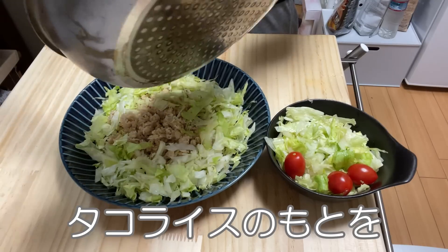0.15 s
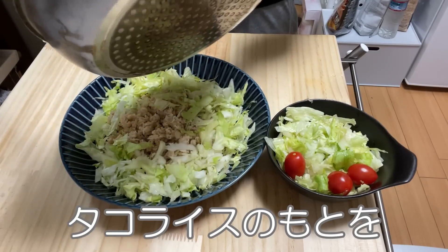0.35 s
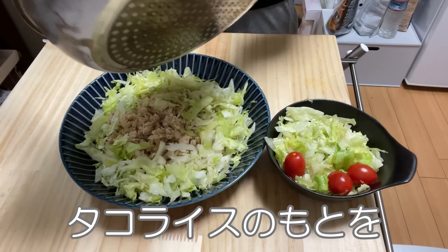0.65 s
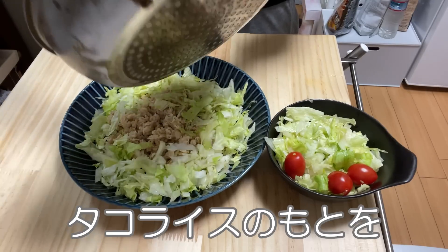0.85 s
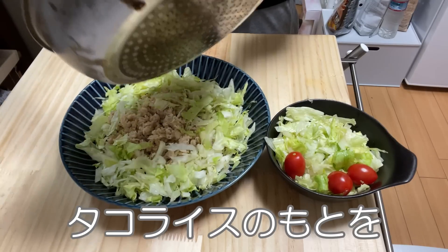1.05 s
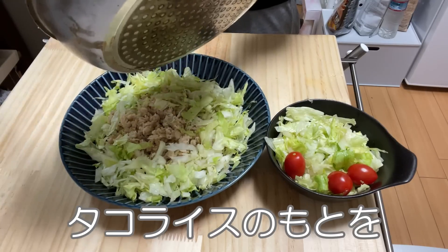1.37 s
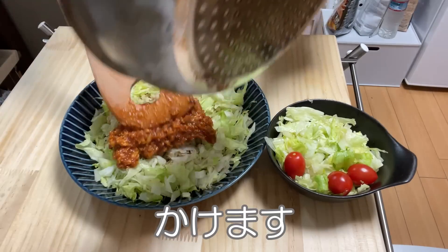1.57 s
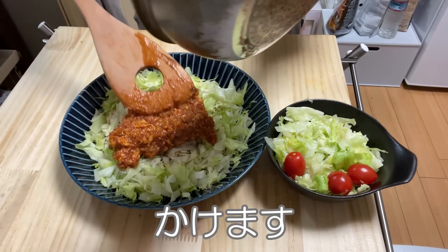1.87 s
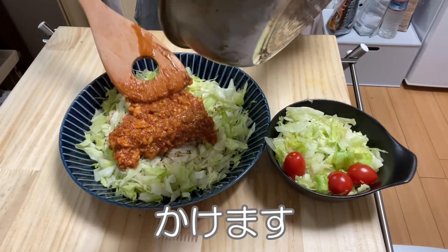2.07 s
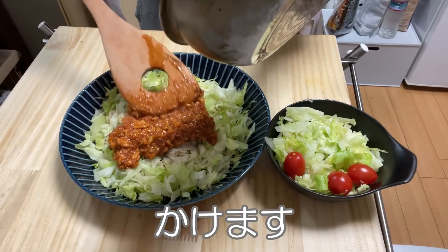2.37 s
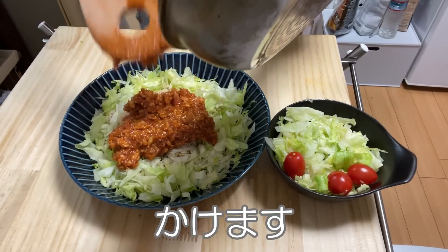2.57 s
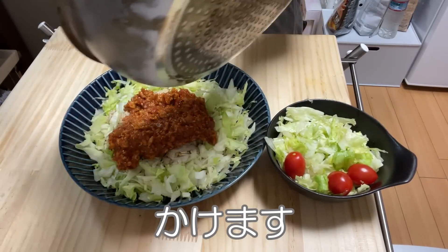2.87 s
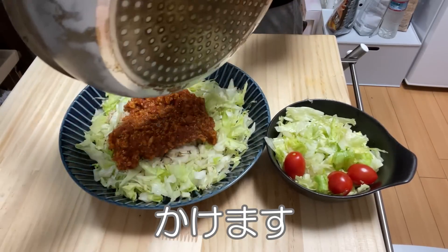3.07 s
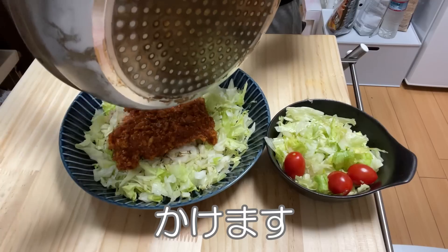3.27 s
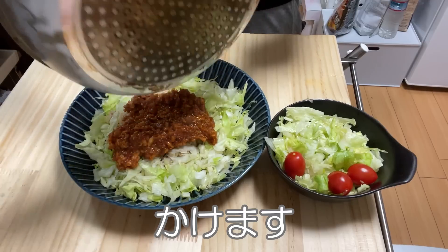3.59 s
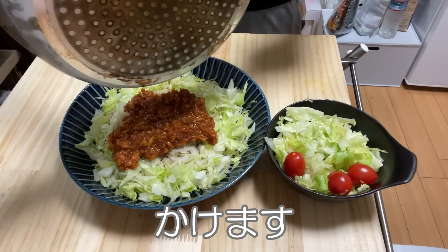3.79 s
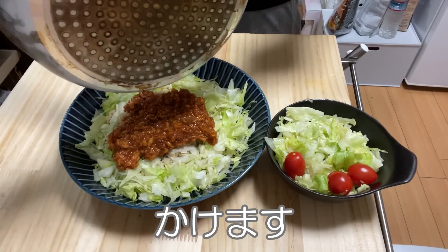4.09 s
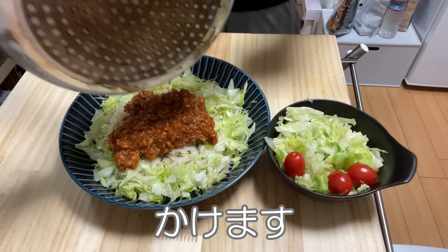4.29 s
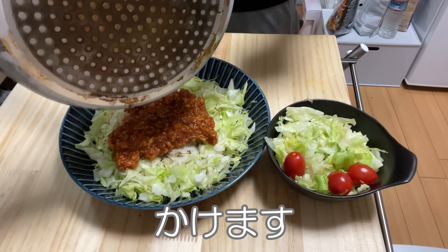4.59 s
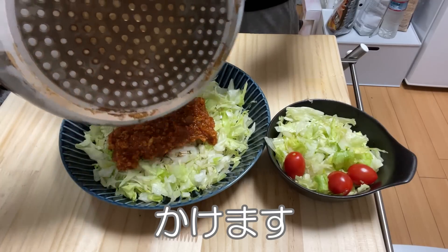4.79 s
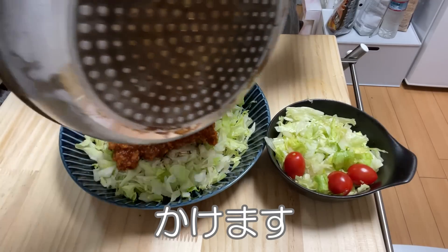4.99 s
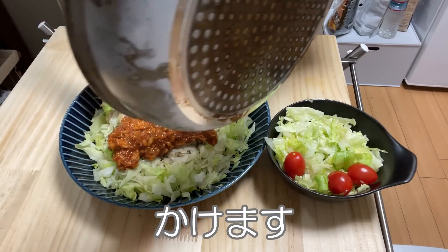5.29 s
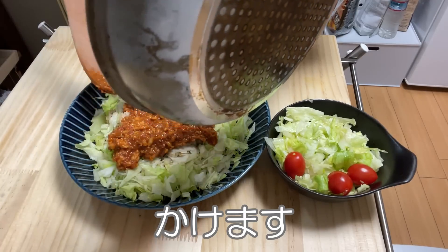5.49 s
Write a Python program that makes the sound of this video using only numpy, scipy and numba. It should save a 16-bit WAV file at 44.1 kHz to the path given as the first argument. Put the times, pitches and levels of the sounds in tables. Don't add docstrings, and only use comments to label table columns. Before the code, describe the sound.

Four fast strokes open the scene, each a hollow wooden knock, small rim bump and rough wet scrape accelerating to a lift. Light rubbing fades into soft drips and fridge hum. A hard double blow follows, then three spaced knock, scrape and bump groups with longer metallic ring. Close stereo phone pickup, overloaded on peaks, short small-room reflections, then faint wet sliding.

```python
import sys
import numpy as np
from scipy import signal
from scipy.fft import rfft, irfft, next_fast_len
from scipy.io import wavfile
from scipy.ndimage import uniform_filter1d
from numba import njit

SR = 44100
rng = np.random.default_rng(int(sys.argv[2]) if len(sys.argv) > 2 else 0)


def elevation(decibels):
    levels = np.asarray(decibels, float)
    return 10 ** (levels / 20)


def wrap_up_sound(samples):
    columns = np.atleast_2d(samples).T
    tamed = np.clip(columns, -1, 1)
    steps = np.round(tamed * 32767).astype(np.int16)
    wavfile.write(sys.argv[1], SR, steps)


N = 248929
UPTURN_S = 2.96


def read(table, hz):
    f, v = np.transpose(table)
    return np.interp(np.log(np.maximum(hz, 1)), np.log(f), v)


def ring(x, hz, t60, skew=0.):
    pole = np.exp((2j * np.pi * hz - np.log(1000) / t60) / SR)
    z = signal.lfilter([1], [1, -pole], x)
    side = np.array([[1], [-1]])
    return (z * np.exp(1j * skew * min(hz / 1000, 1) * side)).imag


def band(x, lo_hz, hi_hz):
    return signal.sosfilt(signal.butter(2, [lo_hz, hi_hz], "band", fs=SR, output="sos"), x)


def unit(x):
    return x / np.sqrt(np.mean(x ** 2))


def walk(rate):
    k = int(SR / rate)
    held = np.repeat(rng.standard_normal(N // k + 1), k)
    return unit(uniform_filter1d(held, k)[:N])


@njit
def sweep(x, hz, width):
    y, b, l = np.empty(len(x)), 0., 0.
    for i in range(len(x)):
        g, k = np.tan(np.pi * hz[i] / SR), width / hz[i]
        v = (b + g * (x[i] - l)) / (1 + g * (g + k))
        b, l, y[i] = 2 * v - b, l + 2 * g * v, k * v
    return y


def soft(y):
    push = np.hanning(15)
    return signal.lfilter(push / push.sum(), [1], y)


# pitch_hz, t60_s, tilted_level_db, upturned_level_db
POT_MODES = [(402.22, 0.22, -28.5, -13.5), (559.36, .045, -12, -11.5), (697.18, 0.2, -30.5, -7),
             (829.8, 0.26, -12, 1), (915, 0.28, -5, -21), (1120, 0.088, -9.5, -12.5),
             (1300.1, 0.047, -11, -7.5), (1669.8, 0.15, 1, 3), (1773.3, 0.13, 0, -14),
             (2012.2, 0.24, -8, -18.5), (2509.2, 0.22, 1, -14.5), (2697.3, 0.16, 2.5, 6.5),
             (3350, .1, -2, -1), (3980, 0.35, -2.5, 1), (4480, 0.21, -1, -6), (5390, 0.36, -12, -3),
             (5799, 0.069, -2.5, -8.5), (6807.9, 0.07, -2.5, -2), (7755, 0.09, -10, -10),
             (8303.6, 0.089, -16.5, -16.5), (8750, .07, -22, -22), (9353.6, 0.15, -12, -2),
             (10549, 0.091, -33, -19.5), (11115, 0.12, -20.5, -17.5), (12243, 0.054, -16.5, -16.5),
             (15530, .06, -20.5, -21)]
# wall_ring_db, crack_db
KNOCKS = [
    (0.035, -7.5, 864.1, -21, -33),
    (0.423, 1.5, 913.3, -14.5, -21),
    (0.753, -7, 932.2, -11, -34),
    (1.053, 2, 924.5, -16, -27),
    (2.895, -31.5, 964, -5.5, -6),
    (2.905, 2.5, 959.7, -13, -20.5),
    (3.492, -4, 1016, -7.5, -16.5),
    (3.934, -11.5, 901.6, -12, -20),
    (4.273, -4.5, 913.5, -3, -11),
]
# wall_ring_db, crack_db
BUMPS = [
    (0.167, -12, 1120, -19, -17.5),
    (0.52, -19, 915, -15, -12.5),
    (0.813, -19, 1110, -10.5, -26),
    (1.149, -12.5, 929.2, -18.5, -23.5),
    (2.977, -14, 943.5, 0.5, -1),
    (3.64, -7.5, 842.6, 0.5, -40.5),
    (3.978, -0.5, 802.1, -5.5, -16.5),
    (4.368, 0.5, 823.7, -1.5, -16),
]
# start_s, peak_db, pitch_hz, t60_s
BLADE = [(0.0345, -16.5, 1141, 0.0302), (0.4229, -5, 1093, 0.01751), (0.7508, -15, 1127, 0.05366),
         (1.0512, -10, 1154, 0.0333), (2.9033, 0, 1207, 0.018453), (2.9737, -12, 1144, 0.029),
         (3.492, -4, 1803, 0.02662), (3.6402, -11.5, 1572, 0.05411), (3.933, -22, 1706, 0.052),
         (3.9757, -1.5, 1327, 0.014883), (4.2721, -2.5, 1765, 0.02385), (4.366, 3, 1617, 0.009744)]
# start_s, peak_db, pitch_hz, t60_s
CLINKS = [
    (0.184, -20, 3243, 0.03955),
    (0.521, -9, 4461, 0.0481),
    (0.8699, -25.5, 4432, 0.058),
    (1.1742, -29, 3455, 0.06675),
    (2.9073, -24, 3317, 0.05),
    (2.9771, -14, 3980, 0.072),
    (4.2707, -13.5, 3314, 0.02963),
]


def blows():
    knock_thud_db, bump_thud_db = -17, -28
    span = SR // 3
    out = np.zeros((2, N + SR))
    t, tap = np.arange(span) / SR, np.arange(span) == 0
    hits = [(*row, knock_thud_db) for row in KNOCKS] + [(*row, bump_thud_db) for row in BUMPS]
    chance = rng.standard_normal((len(hits), len(POT_MODES), 3))
    for (s, db, hz, wall_db, crack_db, thud_db), luck in zip(sorted(hits), chance):
        force = [(300, thud_db), (600, thud_db), (800, 0), (1200, 0),
                 (1500, wall_db), (2200, wall_db), (2700, crack_db)]
        y = elevation(1) * ring(tap, hz, 0.03531)
        y += elevation(thud_db - 3) * ring(tap, 450, 0.014)
        y += elevation(thud_db - 8) * ring(tap, 59, 0.12)
        crack = band(rng.standard_normal((2, span)), 1300, 4500) * np.exp(-t / 0.0052)
        for (f, t60, tilted_db, upturned_db), (size, pitch, skew) in zip(POT_MODES, luck):
            pose_db = upturned_db if s > UPTURN_S else tilted_db
            short = t60 * (.65 if f > 2500 else 1)
            pair = ring(tap, f * (1 + .006 * pitch), short, 0.34 * skew)
            pair += 0.23 * ring(tap, f + 45 + 12 * pitch, short, -.4 * skew)
            bright_db = -4 if f > 2500 else 0
            y += elevation(pose_db + read(force, f) - 11.5 + bright_db + size) * pair
        out[:, int(s * SR):][:, :span] += elevation(db) * (soft(y) + elevation(crack_db + 8.5) * crack)
    for s, db, hz, t60 in BLADE + CLINKS:
        out[:, int(s * SR):][:, :span] += elevation(db + 1.9 * hz / 1000) * soft(ring(tap, hz, t60))
    return out[:, :N]


def column(values):
    return np.array(values)[:, None]


def layers(s, db, rasp_db, hiss_db):
    wall_db, follow = (1, .3) if s > UPTURN_S else (-3, .4)
    return elevation(db + column([0, wall_db + follow * rasp_db, rasp_db, hiss_db]))


# rasp_db, hiss_db
SCOOPS = [
    (0.189, 0.10789, -16.5, -19.5, -27.5),
    (0.525, 0.092, -15, -14.5, -22),
    (0.88, .105, -12.5, -20, -32),
    (1.175, .095, -15, -19.5, -28),
    (1.497, 0.07203, -62.5, -4, -9),
    (2.969, .045, -20, -13, -22),
    (3.623, .1, -22.5, -9.5, -17),
    (3.978, .035, -22.5, -10.5, -16.5),
    (4.364, .05, -26, -7, -14),
]
# rasp_db, hiss_db
SETTLES = [(.05, 0.1965, -34, -31, -35), (.44, 0.0967, -20.5, -18, -29), (.77, 0.1881, -28, -26, -35),
           (1.075, 0.1428, -25, -20, -38), (2.92, 0.1238, -21.5, -14, -38), (2.99, 0.0641, -30, -14, -20),
           (3.51, 0.0427, -30, -5, -26.5), (3.655, 0.051, -23, -22.5, -33), (3.94, 0.0989, -25, -11, -20),
           (3.995, 0.0834, -20.5, -18, -30), (4.29, 0.0806, -27, -8, -28), (4.39, 0.1284, -25, -19, -30.5)]
# rasp_db, hiss_db
RUBS = [(.395, 0.22, -63, 1, 4), (.65, 0.1657, -56, -2.5, 3), (1.24, .14, -51, -12, -26),
        (1.31, 0.1085, -58.5, -4.5, -18.5), (1.4, 0.0022, -56.5, -16, -20), (3.03, 0.0888, -39, -6, -12),
        (3.08, 0.1447, -45.5, -8, -8), (3.13, 0.1315, -48, -12, -14), (3.205, 0.1169, -35.5, -10.5, -11.5),
        (3.7, 0.0214, -33, -21, -21.5), (4.025, 0.0951, -34, -7, -8), (4.44, 0.1414, -42, -12, -26),
        (4.5, 0.0719, -40, -14.5, -14), (4.66, 0.1857, -61.5, -9.5, -5), (4.75, 0.0194, -46.5, -10, -15)]
SPEED_POWER = [1.5, .8, 1.3, 0.69]
LIFT_FALL = [1100, 800, 599.7, 500]
TAIL_LEVEL = [-26, -24, -17, -22.5]
TAIL_FALL = [149.9, 140, 160.1, 139.94]


def stroke_force():
    rub_attack_s, settle_wall_db = .015, -5.5
    settle_curve, rub_curve = 0.73, 1.9
    rest_hz, squeeze_hz = (870.4, 849.25), (139.7, 35)
    t, power, squeeze = np.arange(N) / SR, np.zeros((4, N)), np.zeros(N)
    for s, length, db, rasp_db, hiss_db in SCOOPS:
        on = slice(int((s - length) * SR), int((s + .5) * SR))
        late = np.maximum(t[on] - s, 0)
        speed = np.clip(1 + (t[on] - s) / length, 0, 1)
        after = elevation(-column(LIFT_FALL) * late)
        after = after + (late > 0) * elevation(column(TAIL_LEVEL) - column(TAIL_FALL) * late)
        power[:, on] += (layers(s, db, rasp_db, hiss_db) * speed ** column(SPEED_POWER) * after) ** 2
        squeeze[on] += np.sin(np.pi / 2 * np.minimum(2 * speed, 1)) * np.exp(-late / 0.023)
    contacts = [(*row, settle_curve, settle_wall_db) for row in SETTLES]
    contacts += [(*row, rub_curve, 0) for row in RUBS]
    for s, fall, db, rasp_db, hiss_db, curve, wall_db in contacts:
        on = slice(int(s * SR), int((s + .5) * SR))
        late = t[on] - t[on][0]
        swell = np.minimum(late / rub_attack_s, 1) * elevation(-20 * (late / fall) ** curve)
        power[:, on] += (layers(s, db, rasp_db, hiss_db) * elevation(column([0, wall_db, 0, 0])) * swell) ** 2
    up = 1 * (t > UPTURN_S)
    return np.sqrt(power), np.take(rest_hz, up) + np.take(squeeze_hz, up) * squeeze


def drags():
    push, hz = stroke_force()
    shake = 1.5 * walk(70)
    grit = []
    for p in push:
        chatter = elevation(shake + 3.3 * walk(60) + 1.1 * walk(400))
        grit.append(p * unit(chatter * rng.standard_normal(N)))
    out = elevation(18) * sweep(sweep(grit[0], hz, 170.0), hz, 170.0)
    out += elevation(-5) * band(grit[0], 600, 1400)
    out += elevation(-1) * band(band(grit[1], 1350, 2100), 1350, 2500)
    out += elevation(5) * band(band(grit[2], 2300, 6200), 2300, 6200)
    out += elevation(-9) * band(band(grit[3], 8100, 13500), 8100, 13500)
    for (f, t60, tilted_db, upturned_db), skew in zip(POT_MODES, rng.standard_normal(len(POT_MODES))):
        part = np.searchsorted([1400, 2350, 6200], f)
        held = [0.55, 0.17, .25, 0.4][part] * t60
        lift_db = [-4.5, -5.5, -9.5, 3.5][part]
        pose_db = np.where(np.arange(N) > UPTURN_S * SR, upturned_db, tilted_db)
        force = grit[part] * elevation(pose_db + lift_db)
        out = out + ring(force, f, held, 0.6752 * skew) * np.sqrt(4 * np.log(1000) / (held * SR))
    return band(band(out, 320, 15800), 300, 17000)


# start_s, length_s, level_db, pitch_hz
SLIDE = [
    (4.92, 0.5591, -68.5, 2312),
    (5.591, 0.2285, -65.5, 2431),
]


def slide():
    t, size, hz = np.arange(N) / SR, np.zeros(N), np.zeros(N)
    for s, length, db, f in SLIDE:
        arch = np.sin(np.pi * np.clip((t - s) / length, 0, 1)) ** 0.673
        size += elevation(db) * arch * (t < s + length)
        hz[(t > s) | (hz == 0)] = f
    noise = rng.standard_normal(N)
    high = unit(sweep(sweep(noise, hz, 160.), hz, 160.))
    low = unit(sweep(noise, 0.70094 * hz, 120.))
    return size * elevation(2.092 * walk(22)) * (high + elevation(1) * low)


# start_s, peak_db, pitch_hz
DROPS = [(0.3041, -43.5, 3695), (0.6485, -37.5, 3570), (0.8102, -38.5, 4480), (0.9601, -41, 3500),
         (1.7387, -52.5, 11000), (1.7785, -51, 7400), (1.8931, -50, 12600), (1.9106, -44, 10780),
         (1.9565, -39.5, 7766), (2.4286, -56.5, 11260), (2.4601, -36, 10790), (2.4788, -41, 10800),
         (3.341, -41.5, 7167), (3.8013, -47.5, 11400), (4.7716, -56, 3504), (5.1934, -52.5, 6960),
         (5.2661, -51.5, 4234), (5.47, -53, 11130)]


def drops():
    out, t = np.zeros(N + 800), np.arange(800) / SR
    for s, db, hz in DROPS:
        tone = np.sin(2 * np.pi * hz * t) * np.exp(-t / 0.001272)
        snap = band(rng.standard_normal(len(t)), hz / 2, min(2 * hz, 15000)) * np.exp(-t / 0.003)
        out[int(s * SR):][:len(t)] += elevation(db) * (0.77 * tone + 0.48 * snap)
    return out[:N]


# time_s, level_db
HUM_SWELL = [(0.0, -47.5), (0.39, -52), (0.42, -43), (0.71, -53.5), (0.77, -44), (1.49, -46), (1.55, -56),
             (2.4, -43), (3.12, -53), (3.33, -46), (4.51, -48), (4.67, -42.5), (5.58, -45), (5.64, -51)]


def mains_hum():
    mains_hz, second_db = 60.35, -48.5
    t, out = np.arange(N) / SR, np.zeros(N)
    first = np.interp(np.arange(N) / SR, *np.transpose(HUM_SWELL))
    for k, db in enumerate([first, second_db + 2.5 * walk(5)]):
        turn = np.cumsum((k + 1) * mains_hz + 1.1 * walk(8.5)) / SR
        out += elevation(db + 1.5 + 0.5 * walk(7.1)) * np.sin(2 * np.pi * turn)
    return out


# pitch_hz, level_db
FRIDGE_LINES = [(150.7, -55.5), (236.9, -63.5), (317.6, -60.5), (468.3, -70), (1249, -69)]


def fridge_lines():
    out = np.zeros(N)
    for f, db in FRIDGE_LINES:
        turn = np.cumsum(f + 1.5 * walk(12)) / SR
        out += elevation(db + 2 + 1.7 * walk(9)) * np.sin(2 * np.pi * turn)
    return out


# pitch_hz, density_db_per_hz
AIR = [(18, -39), (30, -16.5), (54, -3.5), (129, -4), (199, -10.5), (322, -12.5), (433, -13.5),
       (556, -15.5), (878, -24.5), (1260, -24), (1450, -31.5), (2570, -45), (7000, -48.5), (9100, -80.5),
       (15400, -120)]
# pitch_hz, correlation
AIR_LIKENESS = [(60, 0.41), (290, 0.76), (640, .1), (5000, .1)]


def room_air():
    size = next_fast_len(N)
    hz = np.fft.rfftfreq(size, 1 / SR)
    like = np.clip(read(AIR_LIKENESS, hz), 0, .99)
    mid, side = rfft(rng.standard_normal((2, size)))
    pair = np.sqrt(1 + like) * mid + np.sqrt(1 - like) * side * np.array([[1], [-1]])
    air = elevation(read(AIR, hz)) * pair * (hz > 25) * (hz < 7500)
    return elevation(-47.5) * unit(irfft(air, size)[:, :N])


# pitch_hz, density_db_per_hz
HISS = [(6500, -33), (7200, -3.5), (8000, -5), (9000, -5.5), (9700, 2), (10700, -9.5), (11700, -8.5),
        (13000, -9.5), (15500, -7.5), (16200, -15)]


def phone_hiss():
    size = next_fast_len(N)
    noise = rfft(rng.standard_normal(size)) * elevation(read(HISS, np.fft.rfftfreq(size, 1 / SR)))
    return elevation(-68.5) * unit(irfft(noise, size)[:N])


def kitchen():
    dip_s, dip_db = 1.505, -1
    late = np.arange(N) / SR - dip_s
    dip = elevation(dip_db * (late > 0) * np.exp(-np.maximum(late, 0) / .5))
    room = dip * (room_air() + fridge_lines()) + mains_hum()
    return room * elevation(np.array([[-1.5], [1.5]])) + phone_hiss()


# pitch_hz, left_minus_right_db
POT_PAN = [(100, -5.5), (250, -14), (500, -11.5), (900, -3), (2400, -2), (4400, -3), (8000, 3)]
# pitch_hz, left_lead_rad
POT_LEAD = [(400, 1.7), (950, 0.9816), (2150, -1.96), (2930, -1.12), (3790, -1.5), (4740, -2.4),
            (7000, -1.5)]


def scene():
    pot, size = blows() + drags() + slide(), next_fast_len(N + SR)
    hz, t = np.fft.rfftfreq(size, 1 / SR), np.arange(SR // 2) / SR
    lead = read(POT_LEAD, hz) * np.minimum(hz / 500, 1)
    tilt = elevation(read(POT_PAN, hz) / 2) * np.exp(.5j * lead)
    walls = rng.standard_normal((2, len(t))) * elevation(-60 * t / 0.25263) * (t > .004)
    walls = rfft(walls / np.sqrt(np.sum(walls[0] ** 2)), size)
    walls = elevation(-8) * walls / (1 + hz / 5000) * np.minimum(hz / 500, 1)
    heard = irfft(rfft(pot, size) * np.array([tilt, 1 / tilt]) * (1 + walls), size)[:, :N]
    return heard + drops() + kitchen()


def roll_off(x):
    return signal.sosfilt(signal.butter(12, 16230, fs=SR, output="sos"), x)


# pitch_hz, left_lead_rad
PORT_LEAD = [(7000, 1.4), (8000, 2.3), (8500, 3.0), (9500, 3.3), (10900, 6.0), (12200, 6.6), (13600, 9.3),
             (15200, 9.5), (15600, 10.2)]


def record(dry):
    port_hz = 7100
    size = next_fast_len(N + 4096)
    hz, (left, right) = np.fft.rfftfreq(size, 1 / SR), rfft(dry, size)
    share = np.clip((hz - port_hz) / 800 + .5, 0, .85)
    late = left * np.exp(-1j * read(PORT_LEAD, hz))
    bass_cut = 1 / np.sqrt(1 + (45 / np.maximum(hz, 1)) ** 6)
    wet = irfft(bass_cut * np.array([left, (1 - share) * right + share * late]), size)[:, :N]
    mix = np.clip(wet, -1, 1)
    return roll_off(mix)


dry = scene()
out = record(dry)
wrap_up_sound(out)
```